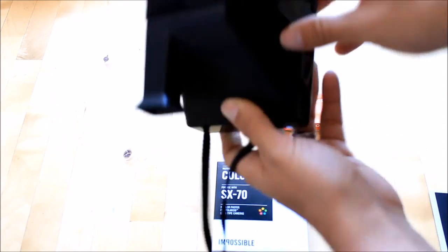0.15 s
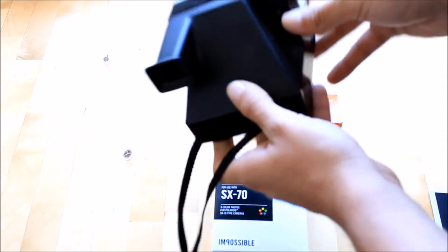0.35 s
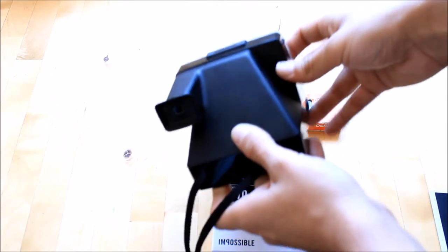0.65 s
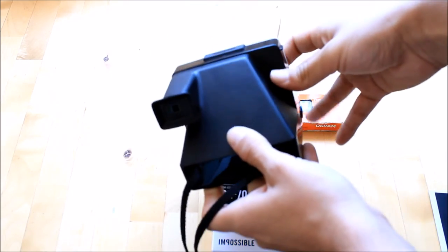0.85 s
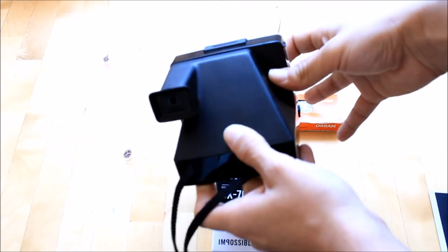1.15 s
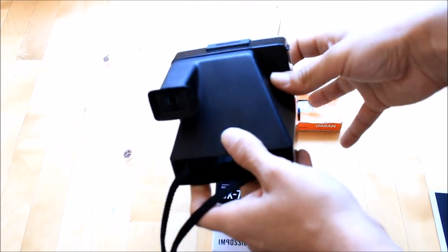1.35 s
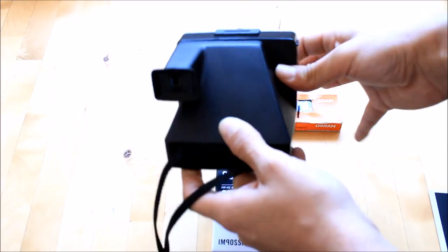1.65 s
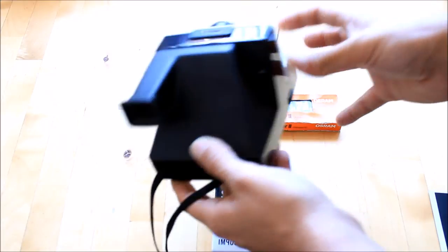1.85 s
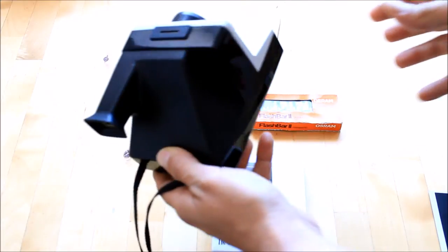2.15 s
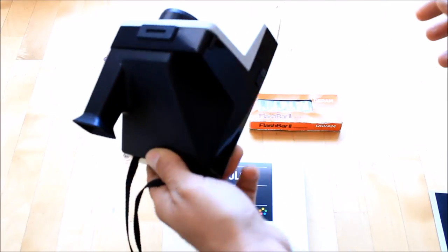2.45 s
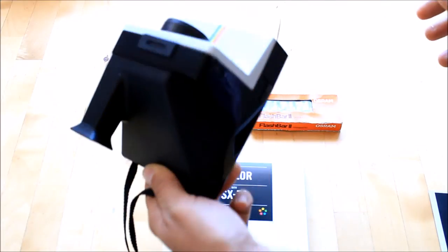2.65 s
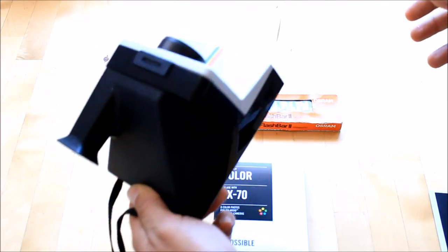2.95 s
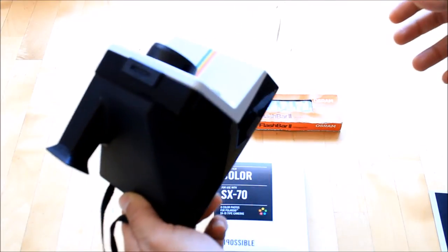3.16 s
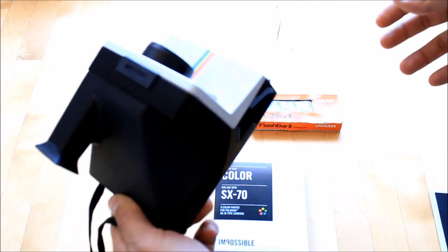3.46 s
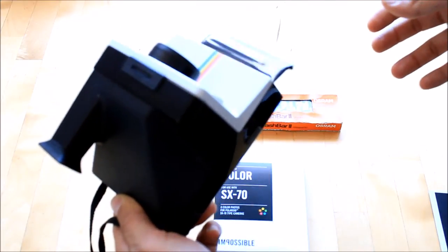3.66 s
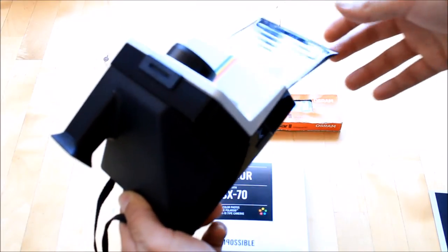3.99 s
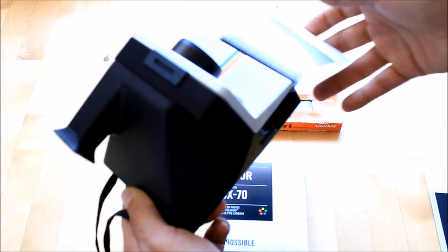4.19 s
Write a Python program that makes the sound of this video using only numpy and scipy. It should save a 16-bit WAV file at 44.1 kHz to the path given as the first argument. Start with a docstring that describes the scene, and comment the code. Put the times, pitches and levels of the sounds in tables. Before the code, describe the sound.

Close mono recording in a small quiet room with faint rumble and hiss. Fingers tick softly on a plastic camera, a hard snap shuts its door, skin brushes the shell. A switch clicks and a bright geared motor whirs with several sharp clacks, then drops in pitch, groaning and rattling as rollers push out a sheet, which slaps clear before the motor runs on, quieter.

```python
"""An instant camera handled in a small room, close to a mono microphone, over house rumble, room rush and hiss.
Fingers tick on the plastic shell (noise bursts through resonances), the film door snaps shut and skin drags on
the shell (grainy noise). A switch clicks and the motor spins up: shaft tones, tooth noise and casing growl.
Rollers then grip a sheet: the motor slows while the sheet rattles, scrapes and sizzles and the rollers groan,
hum and whine. The sheet slaps clear with a soft low thump and the motor runs free again."""
import sys
import numpy as np
from scipy import signal
from scipy.fft import rfft, irfft, next_fast_len
from scipy.io import wavfile
from scipy.ndimage import uniform_filter1d, map_coordinates

SR = 44100
rng = np.random.default_rng(int(sys.argv[2]) if len(sys.argv) > 2 else 0)


def bounce(signal):
    """Save signal as a 16-bit WAV file at the path given by the first command-line argument."""
    frames = np.transpose(np.atleast_2d(signal))
    limited = np.clip(frames, -1, 1)
    pcm = np.round(limited * 32767).astype(np.int16)
    wavfile.write(sys.argv[1], SR, pcm)


N = 190732
# power on, rollers grip the sheet, steady pull begins, sheet out (s)
SWITCH_S, GRIP_S, STEADY_S, CLEAR_S = 2.2, 3.26, 3.76, 4.19


def amp(db):
    """Gain of a level in dB."""
    return 10 ** (np.asarray(db) / 20)


def unit(x):
    """Scaled to rms 1."""
    return x / np.sqrt(np.mean(x ** 2) + 1e-20)


def along(points, hz):
    """Reads (Hz, value) points on a log frequency axis."""
    f, v = np.transpose(points)
    return np.interp(np.log(hz + 1), np.log(f + 1), v)


def curves(rows):
    """One value per sample for each column after the time."""
    s, *cols = np.transpose(rows)
    return [np.interp(np.arange(N) / SR, s, c) for c in cols]


def running(start_s, end_s, fade=0.037):
    """1 between two times, with smooth fades of some seconds outside."""
    t = np.arange(N) / SR
    inside = np.minimum(t - start_s + fade, end_s + fade - t) / fade
    return np.sin(np.pi / 2 * np.clip(inside, 0, 1)) ** 2


def wobble(rate):
    """A smooth random curve, rate knots a second."""
    knots = rng.standard_normal(int(N * rate / SR) + 4)
    return map_coordinates(knots, [np.arange(N) * rate / SR])


def filtered(x, response):
    """x through a complex response of frequency."""
    m = next_fast_len(N + SR // 2)
    return irfft(rfft(x, m) * response(np.fft.rfftfreq(m, 1 / SR)), m)[..., :N]


def ringing(modes):
    """Causal response of (Hz, width in Hz, dB) resonances, alternating in sign."""
    def response(f):
        return sum((-1) ** k * amp(db) * 1j * f * width / (hz * hz - f * f + 1j * f * width)
                   for k, (hz, width, db) in enumerate(modes))
    return response


def noise(response, patchy_db):
    """Coloured noise of rms 1 with patches of random gain in time and frequency."""
    z = signal.stft(rng.standard_normal(N), nperseg=512)[2]
    field = uniform_filter1d(rng.standard_normal(z.shape), 6, 0)
    field = uniform_filter1d(field, 8, 1)
    patchy = z * amp(patchy_db * unit(field))
    return unit(filtered(signal.istft(patchy, nperseg=512)[1][:N], response))


def tones(hz, multiples, levels_db, drift, flutter_db):
    """Multiples of a rate, each with its own unsteady level and phase; phase drifts more in high multiples."""
    turn = 2 * np.pi * np.cumsum(hz) / SR
    total = 0
    for k, db in zip(multiples, levels_db):
        size = np.sqrt(2) * amp(db + flutter_db * wobble(30.23))
        total = total + size * np.sin(k * turn + drift * max(1, k / 7) * wobble(25))
    return total


# The bed. Each row: time in seconds, low rumble of the house in dB, rush of the room in dB.
BED_LEVELS = [(0.0, -51.5, -50.5), (0.22, -56.5, -61), (0.45, -53, -58), (0.9, -54, -59), (1.0, -57, -59.5),
              (1.2, -58, -62), (1.42, -59.5, -60.5), (1.64, -59.5, -54), (1.85, -53, -56), (2.0, -55, -57),
              (2.2, -56, -55)]
# Colour of the house rumble. Each row: frequency in Hz, relative density in dB per Hz.
HOUSE_COLOUR = [(20, -34), (50, -2), (105, -10.5), (135, -8), (180, 2), (230, -4.5), (300, 1), (350, -10.5),
                (420, -0.5), (550, -9.5), (900, -16.5), (1800, -27)]
# Colour of the room rush. Each row: frequency in Hz, relative density in dB per Hz.
RUSH_COLOUR = [(350, -47), (600, -19), (869, -10), (1300, -7.5), (1800, -14), (3480, -18), (6000, -22.5),
               (16000, -31)]
# Colour of the microphone hiss. Each row: frequency in Hz, relative density in dB per Hz.
MICROPHONE_COLOUR = [(300, -8), (2000, 9.5), (6000, -2), (9000, 1.5), (12000, -2.5), (16000, -15)]


def background():
    """The low rumble of the house and a soft rush in the room swell and ebb over a level microphone hiss."""
    house_db, rush_db = curves(BED_LEVELS)
    house = amp(house_db) * noise(lambda f: amp(along(HOUSE_COLOUR, f)), patchy_db=.6)
    rush = amp(rush_db) * noise(lambda f: amp(along(RUSH_COLOUR, f)), patchy_db=.8)
    hiss = amp(-64) * noise(lambda f: amp(along(MICROPHONE_COLOUR, f)), patchy_db=.8)
    return house + rush + hiss


# Decay of the room's answer. Each row: frequency in Hz, t60 in seconds.
ROOM_DECAY = [(200, 0.71), (1000, 0.47), (4000, 0.32), (12000, 0.29)]


def room(x):
    """The room's answer: each frequency fades at its own speed, the fall steepening slightly."""
    hz, t, z = signal.stft(rng.standard_normal(SR // 2), SR, nperseg=256)
    decay_db = -60 * (t / along(ROOM_DECAY, hz)[:, None]) ** 1.06
    tail = signal.istft(z * amp(decay_db), SR, nperseg=256)[1]
    delayed = np.pad(x, (200, 0))  # samples
    return signal.fftconvolve(delayed, tail / np.linalg.norm(tail))


# Fingers dragging over the shell. Each row: time in seconds, level in dB before the grain.
DRAG_LEVELS = [(1.034, -75), (1.039, -52), (1.06, -57), (1.1, -60), (1.13, -75), (1.21, -75), (1.23, -58),
               (1.25, -75), (1.415, -75), (1.424, -50), (1.445, -50), (1.46, -75), (1.721, -75),
               (1.724, -48), (1.727, -43), (1.738, -44), (1.765, -39), (1.79, -44), (1.825, -48),
               (1.9, -62)]
# Colour of skin on plastic. Each row: frequency in Hz, relative density in dB per Hz.
DRAG_COLOUR = [(300, -24), (700, -4.5), (1300, -4.5), (2000, 1), (2700, -13), (5000, -15.5), (8000, -20.5),
               (16000, -21)]


def finger_drag():
    """Skin sticks and slips over the plastic in fine grains."""
    grains = amp(curves(DRAG_LEVELS)[0] + 2.5 * wobble(400))
    skin = noise(lambda f: amp(along(DRAG_COLOUR, f)), patchy_db=3.0)
    return grains * skin * running(DRAG_LEVELS[0][0], DRAG_LEVELS[-1][0], fade=.003)


def thump():
    """One soft low thump as the sheet comes out."""
    start_s, gain_db, hz = 4.193, -17, 42
    u = np.clip(np.arange(N) / SR - start_s, 0, 1) * 2 * np.pi * hz
    return amp(gain_db) * u * (2 - u) * np.exp(-u)


# Thin squeaks. Each row: start in seconds, length in seconds without the fades, pitch in Hz, level in dB.
SQUEAK_NOTES = [(3.376, 0.057, 2094, -31), (3.24, .03, 1370, -35), (3.62, 0.086, 525, -38.5),
                (3.655, .03, 1890, -36), (3.72, 0.022, 1050, -28), (3.87, 0.017, 2055, -31.5),
                (3.874, 0.077, 2630, -33.5), (4.04, 0.036, 1985, -33.5)]


def squeaks():
    """Short thin tones come and go in the gears."""
    return sum(tones(np.full(N, hz), [1], [db], drift=1.0, flutter_db=2.5) * running(s, s + length, fade=.02)
               for s, length, hz, db in SQUEAK_NOTES)


def wandering(modes):
    """Narrow bands of noise whose pitch starts sharp, settles and wanders with the speed of the sheet."""
    x = noise(lambda f: ringing(modes)(f) ** 2, patchy_db=1.8)
    since_grip = np.clip(np.arange(N) / SR - GRIP_S, 0, None)
    sharp_share, settle_s = 0.02, 0.09
    speed = 1 + sharp_share * np.exp(-(since_grip / settle_s) ** 2) + .009 * wobble(16)
    return map_coordinates(x, [np.cumsum(speed) % (N - 1)])


# The sheet in the rollers. Each row: time in seconds, then shell rattle, scrape and sizzle, each in dB.
SHEET_LEVELS = [(3.235, -28.5, -29.5, -19.5), (3.33, -32, -26, -34), (3.38, -29, -28.5, -44),
                (3.49, -26, -21.5, -34.5), (3.54, -31.5, -33, -34), (3.65, -33, -25, -32),
                (3.7, -28.5, -27, -19), (3.82, -34, -27, -24.5), (4.05, -37, -23, -29),
                (4.19, -43, -32, -23.5)]
# Three sets of resonances: the shell, the scrape and the exit lip; their summed response is applied twice.
# Each row: frequency in Hz, width in Hz, level in dB for a single pass.
SHELL_MODES = [(810, 70, -6), (915, 60, -3), (1025, 40, 3), (1170, 60, -6)]
SCRAPE_MODES = [(5090, 55, -8), (5275, 45, 0), (5460, 60, -2), (5590, 60, -1.5), (5710, 45, -5)]
LIP_MODES = [(2620, 50, -3), (3480, 70, -4), (3970, 60, -4), (4150, 50, -1), (4290, 50, -1), (4470, 60, -1),
             (4790, 70, -3), (8140, 120, -4), (8930, 80, -3), (11800, 150, -2), (12250, 250, 0)]


def sheet():
    """The squeezed sheet shakes the shell in lumps, scrapes in the rollers and sizzles over the exit lip."""
    rattle_db, scrape_db, sizzle_db = curves(SHEET_LEVELS)
    lumps = amp(rattle_db + 3.6 * wobble(110))
    rattle = lumps * noise(lambda f: ringing(SHELL_MODES)(f) ** 2, patchy_db=1.0)
    scrape = amp(scrape_db + 0.95 * wobble(54)) * wandering(SCRAPE_MODES)
    sizzle = amp(sizzle_db) * wandering(LIP_MODES)
    return (rattle + scrape + sizzle) * running(SHEET_LEVELS[0][0], CLEAR_S, fade=0.006)


# Swell of the mesh tone under the pull. Each row: time in seconds, gain in dB.
MESH_GAIN = [(3.56, 1), (3.7, 0), (3.8, 5), (3.9, -2.5), (4.0, 0.5), (4.16, -1)]
# A whine of the rollers. Each row: time in seconds, pitch in Hz, level in dB.
WHINE_GLIDE = [(3.28, 2710, -37), (3.41, 2680, -38), (3.43, 2800, -46), (3.46, 2860, -35),
               (3.56, 2850, -39), (3.66, 2900, -44), (3.72, 2950, -33), (3.85, 2990, -33),
               (3.93, 2985, -32), (4.02, 2985, -55)]
# The groan as the rollers bite. Each row: time in seconds, pitch in Hz, level in dB.
GROAN_GLIDE = [(3.265, 1000, -33), (3.285, 960, -34), (3.305, 935, -27), (3.35, 840, -36), (3.4, 905, -31),
               (3.44, 955, -30), (3.475, 1015, -26), (3.49, 900, -36), (3.515, 935, -29), (3.56, 920, -37)]


def rollers():
    """A low hum, a gear mesh tone, a gliding groan and a thin whine while the sheet passes through."""
    t = np.arange(N) / SR
    hum_s, mesh_s, end_s = 3.47, 3.56, CLEAR_S - .03
    hum_hz = 207.5 + 9.6 * (t - hum_s)  # rises in Hz per second
    hum = tones(hum_hz, [1], [-45.5], drift=0.32, flutter_db=2.0) * running(hum_s, end_s)
    mesh_hz = (439 + 20 * (t - mesh_s)) * (1 + .012 * wobble(9.2))  # the rollers' speed wavers
    mesh_db = np.add.outer([-43.5, -37, -44], curves(MESH_GAIN)[0])
    mesh = tones(mesh_hz, [1, 2, 4], mesh_db, drift=.6, flutter_db=3.5) * running(mesh_s, end_s)
    groan_hz, groan_db = curves(GROAN_GLIDE)
    groan = tones(groan_hz, [1], [groan_db], drift=1.1, flutter_db=4)
    groan = groan * running(GROAN_GLIDE[0][0], GROAN_GLIDE[-1][0], fade=.015)
    whine_hz, whine_db = curves(WHINE_GLIDE)
    whine = tones(whine_hz, [1], [whine_db], drift=1.0, flutter_db=2.5)
    whine = whine * running(WHINE_GLIDE[0][0], WHINE_GLIDE[-1][0])
    return hum + mesh + groan + whine


TURN_MID_S = 2.43  # the turn of the camera in the hand: reference time for levels that change through it
# Motor casing, its response applied twice. Each row: frequency in Hz, width in Hz, level in dB for a single pass.
CASING_MODES = [(1365, 65, 0), (1450, 120, 0), (1667, 41, 4), (1894, 51, 2.5), (2350, 170, -18),
                (3657, 60, 1.5)]


def growl():
    """The free-running gears shake the motor casing in lumps, fading until the sheet is gripped."""
    t = np.arange(N) / SR
    fade_db_per_s = 6.5
    level_db = -32.5 - fade_db_per_s * (t - TURN_MID_S) + 4.1 * wobble(70)
    casing = noise(lambda f: ringing(CASING_MODES)(f) ** 2, patchy_db=3.0)
    return amp(level_db) * casing * running(SWITCH_S + 0.14, GRIP_S, fade=0.099)


def shaft_hz():
    """The motor spins up, sags slowly, is dragged down unevenly by the sheet and recovers when it is out."""
    t = np.arange(N) / SR
    on = np.clip(t - SWITCH_S, 0, None)
    spin_up_s, sag_hz_per_s = .05, 3.2
    free = FREE_HZ * (1 - np.exp(-on / spin_up_s)) - sag_hz_per_s * on
    pulling = 165.4 * (1 + .006 * wobble(10))  # turns a second
    pull_share = np.interp(t, [GRIP_S, STEADY_S, CLEAR_S, CLEAR_S + 0.032], [0, 1, 1, 0])
    return free + pull_share * (pulling - free)


# Gear train. Each row: time in seconds, tooth noise in dB before its pulsing.
GEAR_LEVELS = [(2.23, -34), (2.27, -29.5), (2.36, -24), (2.47, -21), (2.58, -23), (2.76, -23.5),
               (2.96, -19.5), (3.5, -19), (4.0, -19.5), (4.17, -23.5), (4.21, -27), (4.32, -27.5)]
# Blend of the two gear colours. Each row: time in seconds, share of the second from 0 to 1.
COLOUR_BLEND = [(2.2, 0.09), (3.2, 0.42), (3.26, 0.55), (3.6, 0.64), (4.16, 0.56), (4.22, 0)]
# First gear colour. Each row: frequency in Hz, relative density in dB per Hz.
FIRST_COLOUR = [(90, -55), (200, -28), (400, -16.5), (800, -10.5), (1300, -6.5), (1900, -5.5),
                (2280, -12.5), (2700, -10), (4000, -12), (6500, -11), (8000, -7.5), (9500, -11.5),
                (10800, -10.5), (13000, -13.5), (15000, -16), (16000, -39)]
# Second gear colour. Each row: frequency in Hz, relative density in dB per Hz.
SECOND_COLOUR = [(90, -90), (170, -17.5), (320, -22.5), (500, -18.5), (900, -3), (1500, -11), (3000, -4.5),
                 (4500, -3), (7000, -11), (12300, -6), (16000, -14)]


def gears():
    """Dense tooth noise that pulses once a shaft turn and blends between two colours."""
    share = np.clip(curves(COLOUR_BLEND)[0], 0, 1)
    turn = 2 * np.pi * np.cumsum(shaft_hz()) / SR
    pulse = amp(.4 * np.cos(turn) + 1.5 * wobble(400) + .4 * wobble(40))
    first = noise(lambda f: amp(along(FIRST_COLOUR, f)), patchy_db=1.2)
    second = noise(lambda f: amp(along(SECOND_COLOUR, f)), patchy_db=1.5)
    teeth = np.sqrt(1 - share) * first + np.sqrt(share) * second
    return amp(curves(GEAR_LEVELS)[0]) * pulse * teeth * running(GEAR_LEVELS[0][0], N / SR)


def burst(t60, response, crack):
    """A dying rattle of peak 1 with a 3 ms crack in front, through a response."""
    t = np.arange(SR // 8) / SR
    t60s = [[np.clip(t60, .004, .1)], [.003]]
    rattle, snap = rng.standard_normal((2, len(t))) * amp(-60 * t / t60s)
    spectrum = rfft(rattle + crack * snap, 2 * len(t))
    x = irfft(spectrum * response(np.fft.rfftfreq(2 * len(t), 1 / SR)))[:len(t)]
    return x / np.abs(x).max()


def add(out, s, hit, room_db):
    """Places a hit and the room's answer."""
    for x in (hit, amp(room_db) * room(hit)):
        out[round(s * SR):][:len(x)] += x


# Sharp contacts on plastic. Each row: start in seconds, peak in dB before the knock and room, brightest Hz,
# rattle t60 in seconds (held to 0.1 at most), room in dB.
SHARP_CONTACTS = [(0.101, -28, 3870, 0.079, -6.5), (0.1055, -36, 4200, 0.03, -4),
                  (0.227, -25, 5850, 0.043, -3.5), (0.277, -31, 3000, 0.0075, 0),
                  (0.3582, -29.5, 4860, 0.055, -2.5), (1.456, -19, 5800, 0.11, -1),
                  (1.461, -5.5, 11400, 0.011, 5), (1.4627, -1, 8800, 0.025, -4.5),
                  (1.4647, -9.5, 3500, 0.021, -0.5), (1.4700, -12.5, 3580, 0.028, 0),
                  (1.4756, -12, 4500, 0.022, -1), (1.491, -21, 5000, 0.046, -10),
                  (1.521, -15.5, 4500, 0.079, -1.5), (1.552, -21.5, 4000, .08, -11),
                  (1.578, -29.5, 4000, .08, -11), (1.598, -34.5, 3500, 0.037, -12.5),
                  (1.7255, -31, 4060, 0.05, -1), (2.127, -41, 3500, .03, -5), (2.205, -7, 8850, 0.03, -12),
                  (2.2054, -13.5, 2500, 0.063, -10), (2.21, 0.5, 13600, 0.01, -20),
                  (2.2125, -17, 9100, .06, -20), (2.2198, -13, 3340, 0.056, -4),
                  (2.4574, -8, 8000, 0.05, -12), (2.462, -8, 8000, .06, -15),
                  (2.5111, -5, 10500, 0.035, -22), (2.5138, -10, 10500, .04, -20),
                  (2.5162, -7.5, 7950, .06, -15), (2.637, -12, 8200, 0.042, -14),
                  (2.6401, -7, 8200, 0.06, -12), (2.649, -8.5, 6900, 0.062, -7),
                  (2.6862, -0.5, 12700, 0.013, -10), (2.69, -4.5, 7850, 0.037, -7),
                  (2.696, -6, 11900, .04, -2), (3.4948, -5.5, 11100, 0.081, -22),
                  (3.498, -8, 5530, 0.048, -14), (4.0943, -7, 12000, 0.03, -9),
                  (4.1005, -3, 13000, 0.0054, -14), (4.18, -3.5, 8650, 0.012, 2),
                  (4.191, -3, 6800, 0.013, -6), (4.1947, 2, 8000, 0.0089, -12),
                  (4.1955, -6, 3000, 0.01, -10), (4.2018, -10.5, 3770, 0.02, -3)]
# Dull contacts of fingers and gears. Each row: start in seconds, peak in dB before the room, centre in Hz,
# t60 in seconds (held to 0.1 at most).
DULL_CONTACTS = [(0.3495, -30, 920, 0.028), (0.351, -33.5, 306, 0.03), (0.4167, -31.5, 1050, 0.006),
                 (1.038, -44.5, 1700, 0.027), (1.427, -46, 1100, 0.068), (1.437, -45, 2000, 0.05),
                 (1.742, -31, 1830, 0.035), (1.756, -43, 1800, 0.03), (1.765, -36, 1510, 0.037),
                 (1.774, -43, 2000, 0.021), (1.813, -49, 1950, 0.044), (1.831, -39.5, 325, 0.1),
                 (1.96, -43.5, 900, 0.1), (3.24, -12, 810, 0.026), (3.243, -21.5, 342, 0.13),
                 (3.498, -19, 440, 0.13)]
# Plastic resonances. Each row: frequency in Hz, width in Hz, level in dB.
PLASTIC_MODES = [(3900, 600, -16), (5000, 400, -14), (7200, 700, -10), (9200, 1200, -14),
                 (11400, 1500, -12), (13200, 1000, -13)]
# Resonances of the knocked shell. Each row: frequency in Hz, width in Hz, level in dB.
KNOCK_MODES = [(330, 216, -17), (920, 365, -9.5), (1980, 1520, -11)]


def contacts():
    """Sharp contacts crack and rattle in the plastic and knock the shell; dull ones only knock."""
    out = np.zeros(N + 2 * SR)
    for s, db, hz, t60, room_db in SHARP_CONTACTS:
        colour = lambda f: ringing(PLASTIC_MODES)(f) + ringing([(hz, .9 * hz, -1.5)])(f) ** 2
        # the brighter the click the less it knocks, 4.5 dB an octave about 6 kHz
        knock_db = db - 11 - 4.5 * np.log2(hz / 6000)
        knock = amp(knock_db) * burst(t60, ringing(KNOCK_MODES), crack=0.39)
        add(out, s, amp(db) * burst(t60, colour, crack=0.76) + knock, room_db)
    for s, db, hz, t60 in DULL_CONTACTS:
        dull = burst(t60, lambda f: ringing([(hz, .8 * hz, 0)])(f) ** 2, crack=1.0)
        add(out, s, amp(db) * dull, room_db=-4.5)
    return out[:N]


FREE_HZ = 204.6  # shaft turns a second that the spin-up heads for, before the sag
# The shaft orders that sound, as multiples of the shaft rate.
SHAFT_ORDERS = (5, 6, 2, 3, 4, 7, 8, 9, 12, 16, 26, 10, 13, 18, 23)
# The two loudest orders as the camera is turned. Each row: time in seconds, 5th order in dB, 6th order in dB.
LOUDEST_ORDERS = [(2.33, -35, -32), (2.42, -38, -26), (2.456, -34, -26.5), (2.646, -39, -36),
                  (2.794, -47, -34), (2.806, -40.5, -28), (2.996, -28.5, -30), (3.094, -28, -32.5),
                  (3.236, -32, -53), (3.25, -37, -45)]
# The other orders in turn: level in dB at the middle of the turn, and its change in dB per second.
FREE_ORDER_DB = [-47, -43.5, -43, -36, -42, -35, -41, -45, -56, -44, -45, -44, -47]
TURN_CHANGE = [-5, 5.5, 4, 1, -5, -1, -6, 10.5, 0, 0, 4, -7, -3]
# All orders in turn: level in dB under a steady pull.
PULL_ORDER_DB = [-79, -44, -74, -79, -74, -32, -38, -44, -39, -42, -39, -45, -44, -60, -44]


def motor():
    """Shaft orders stand out while the speed is steady: running free, pulling, then free again."""
    t = np.arange(N) / SR
    before_grip = t < GRIP_S
    free = np.array(FREE_ORDER_DB)[:, None]
    pull = np.array(PULL_ORDER_DB)[:, None]
    turned = np.vstack([curves(LOUDEST_ORDERS), free + np.outer(TURN_CHANGE, t - TURN_MID_S)])
    after = turned.mean(axis=1, keepdims=True) - 15.5  # weaker once the sheet is out
    levels_db = np.where(t > (GRIP_S + STEADY_S) / 2, pull, turned)
    levels_db = np.where(t > CLEAR_S, after, levels_db)
    levels_db = levels_db + 1.5 * np.array([wobble(8) for _ in SHAFT_ORDERS])  # slow swells in dB
    steady = running(SWITCH_S + 0.089, GRIP_S, fade=0.015)
    steady = steady + running(STEADY_S, CLEAR_S - .04) + running(CLEAR_S + 0.046, N / SR)
    hz = shaft_hz()
    # until the grip the tones grow with a power of the speed
    grown = np.where(before_grip, np.clip(hz / FREE_HZ, 0, 1) ** 6.3, 1)
    # rougher from the grip on
    drift, flutter_db = np.where(before_grip, .65, .9), np.where(before_grip, 2.8, 3.5)
    return tones(hz, SHAFT_ORDERS, levels_db, drift, flutter_db) * steady * grown


def scene():
    """One microphone on both channels."""
    handling = finger_drag() + contacts()
    ejecting = thump() + squeaks() + sheet() + rollers()
    driving = growl() + gears() + motor()
    mono = background() + handling + ejecting + driving
    return np.array([mono, mono])


def record(dry):
    """The loudest peaks clip softly; the recorder cuts the bass and keeps nothing above its band limit."""
    held = dry / (1 + np.abs(dry) ** 6) ** (1 / 6)
    top_hz, bass_hz = 16100, 110

    def response(hz):
        bass_cut = (1j * hz / (1j * hz + bass_hz)) ** 2
        return np.clip((top_hz - hz) / 500, 0, 1) * bass_cut
    return filtered(held, response)


dry = scene()
out = record(dry)
bounce(out)
```